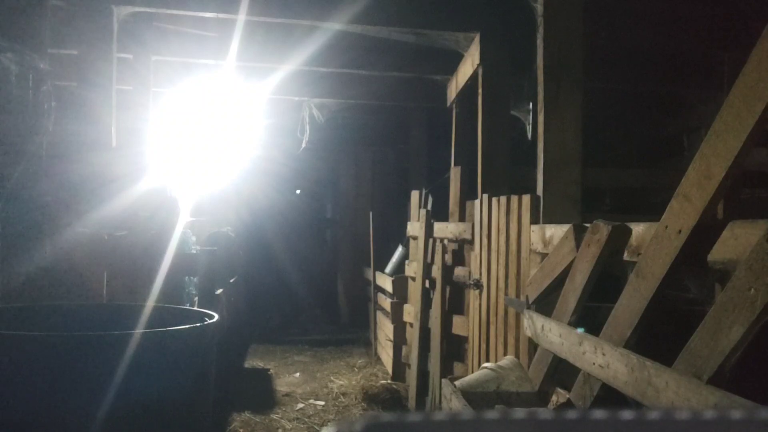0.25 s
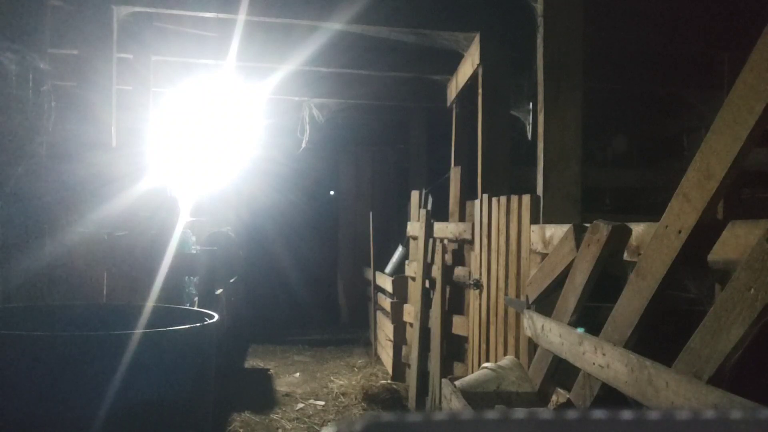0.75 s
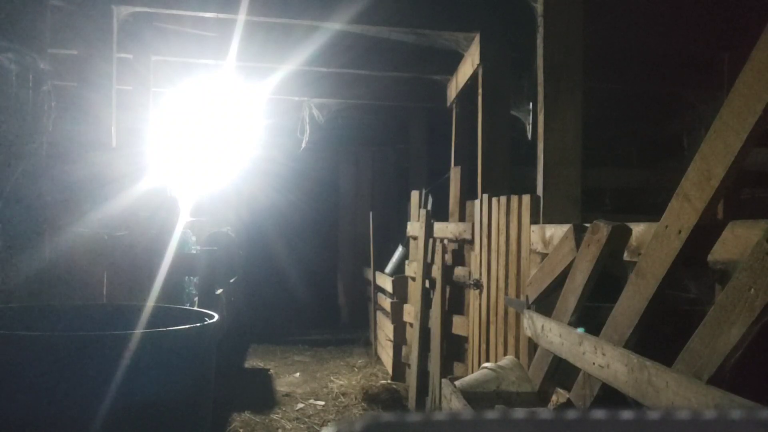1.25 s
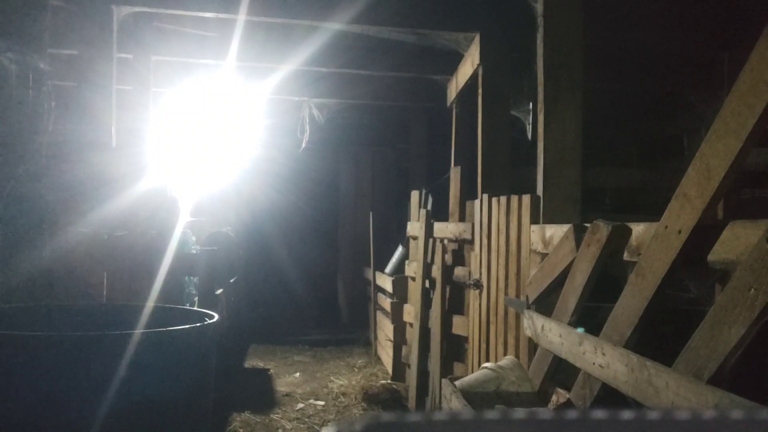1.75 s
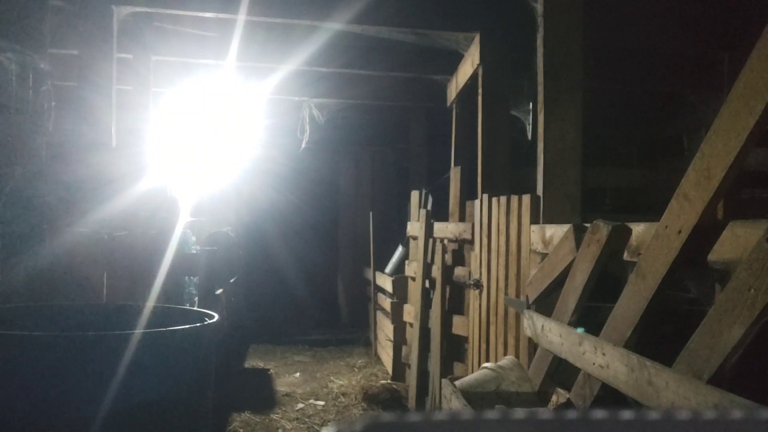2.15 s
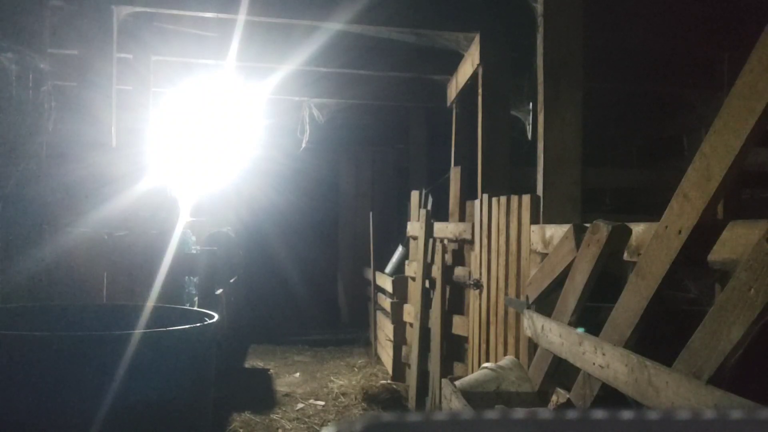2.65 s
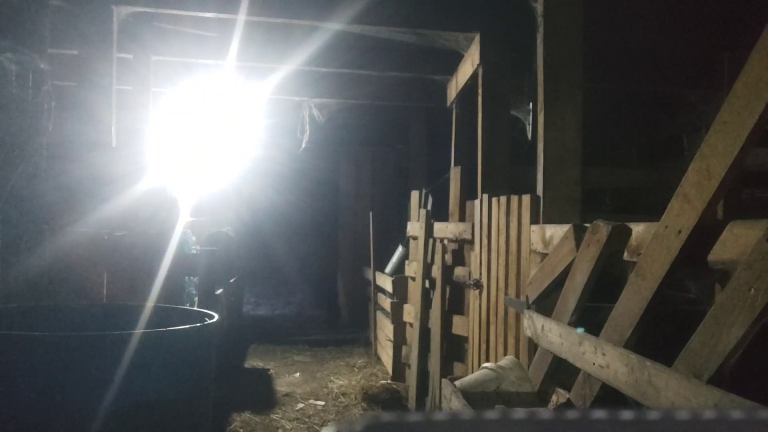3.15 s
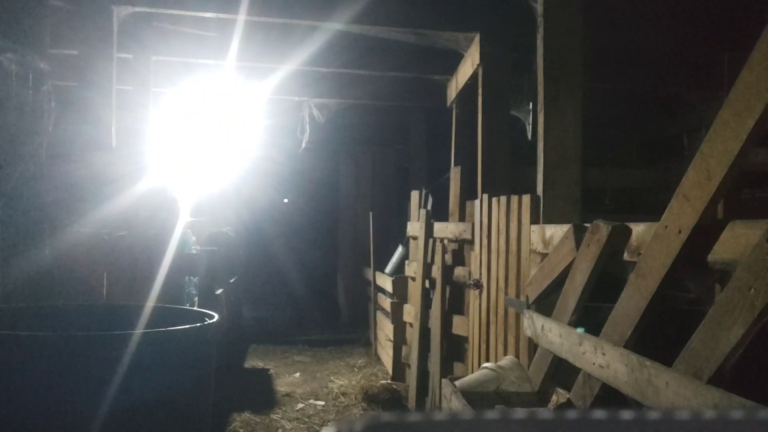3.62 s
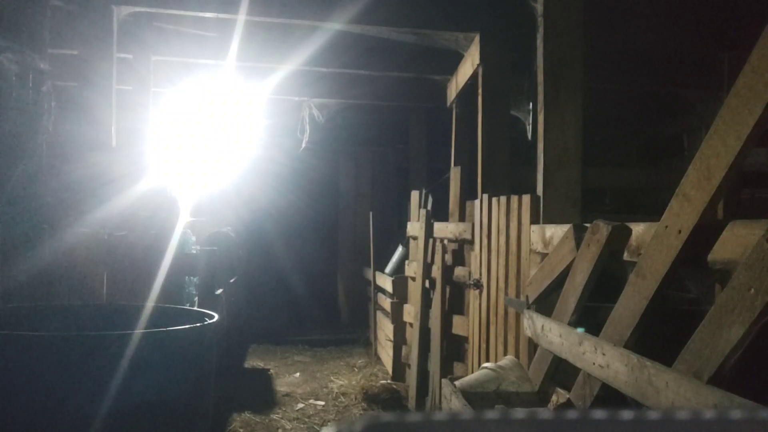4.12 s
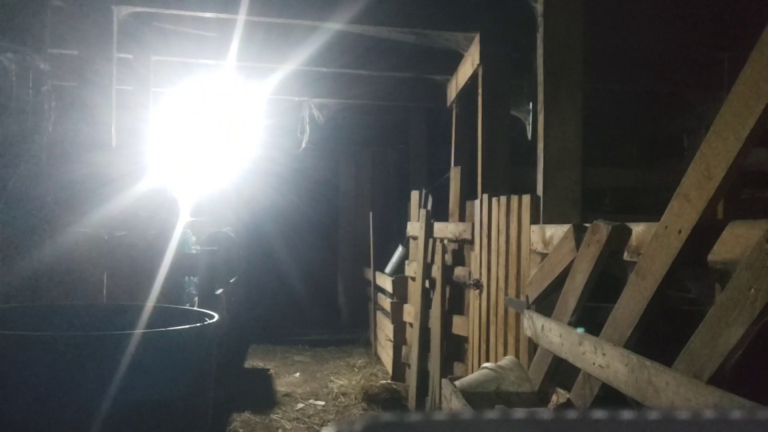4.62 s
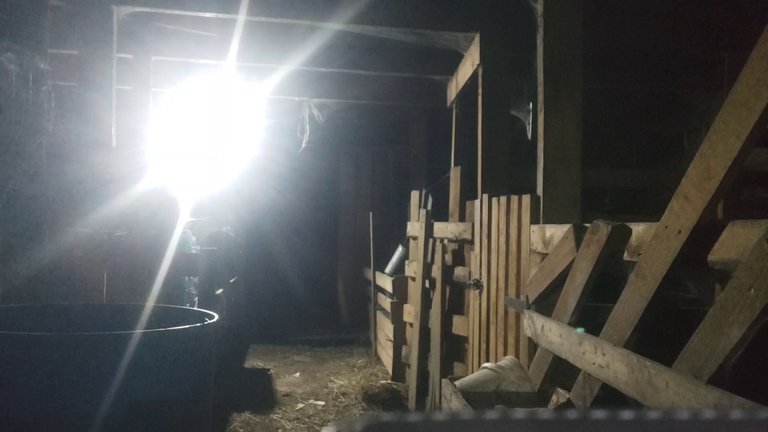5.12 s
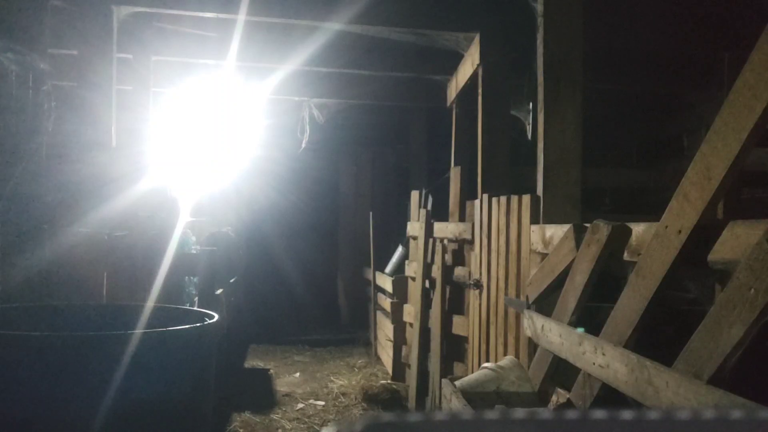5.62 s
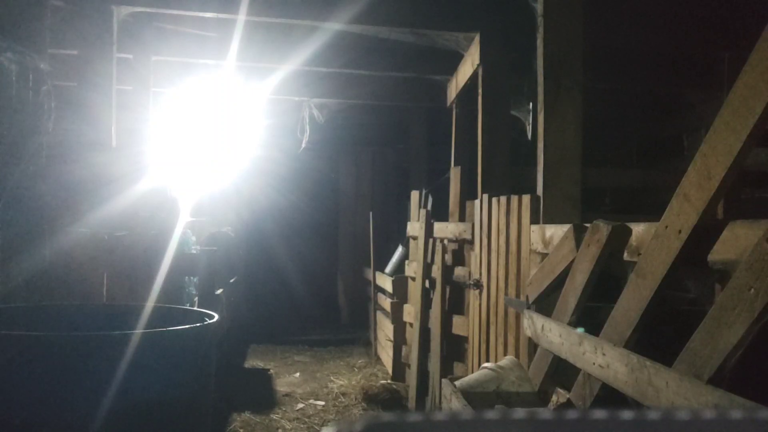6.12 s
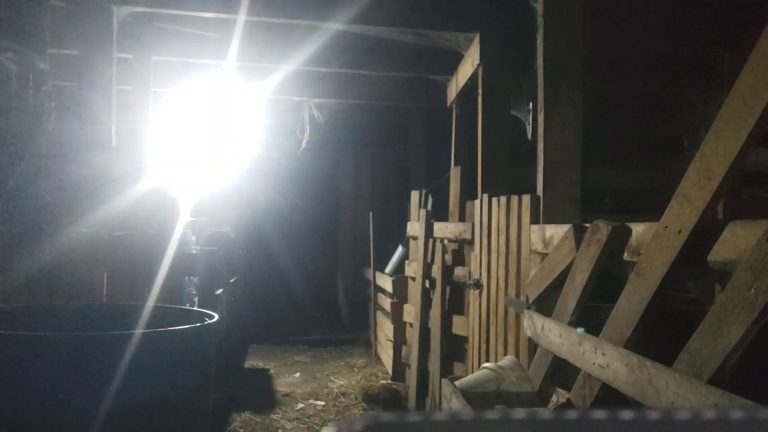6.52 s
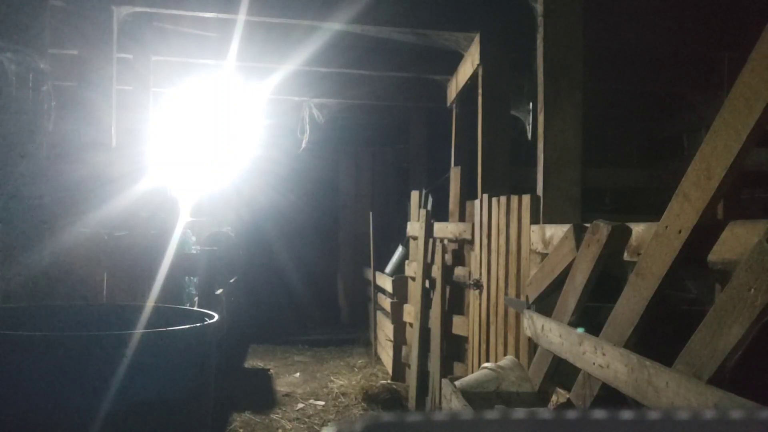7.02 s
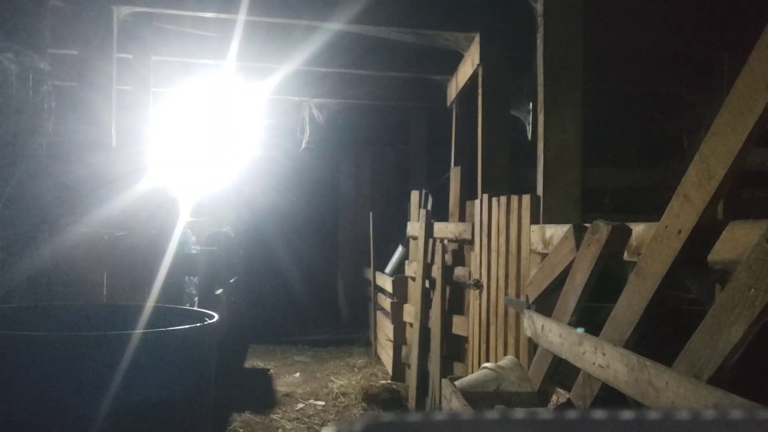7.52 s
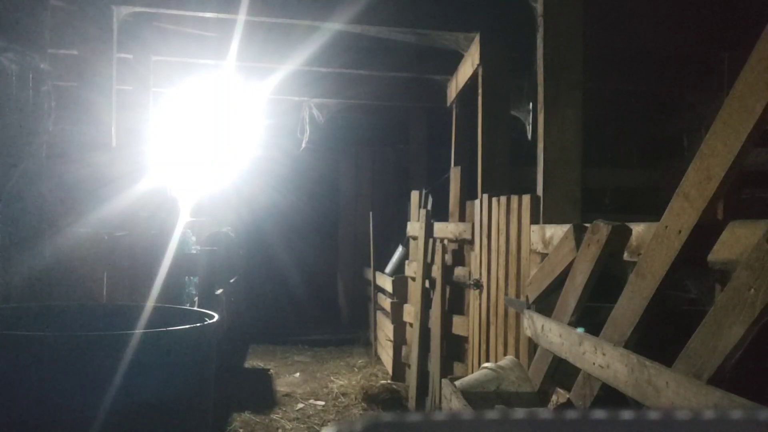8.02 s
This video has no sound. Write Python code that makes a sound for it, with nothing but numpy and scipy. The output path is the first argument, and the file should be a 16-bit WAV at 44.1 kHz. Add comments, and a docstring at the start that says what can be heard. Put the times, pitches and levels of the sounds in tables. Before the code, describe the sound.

In a small wooden barn at night, faint hens call in the distance over low quiet air. A deep plank-door thump lands just before one second, with another weaker double knock around 1.6 seconds, then soft scraping and straw rustle. Low clucks follow, a hen whines waveringly for about a second, and quicker clucks end it. Fixed stereo microphone, short woody echo.

```python
"""Hens in a wooden barn. From the start hens call far off, over a dull murmur, straw and still air;
two main plank-door thumps follow, with crackling contacts, more knocks, two scrapes and a hinge squeak.
Hens cluck in short runs, and from 4.5 s one whines for about a second before the last clucks.
Voices are flutter-modulated harmonics with breath noise and a short echo; the door is noise through
resonances and decaying modes; contacts, straw, murmur and air are coloured noise."""
import sys
import numpy as np
from scipy import signal
from scipy.fft import rfft, irfft, next_fast_len
from scipy.io import wavfile
from scipy.ndimage import map_coordinates

SR = 44100
rng = np.random.default_rng(int(sys.argv[2]) if len(sys.argv) > 2 else 0)


def inscribe(sig):
    """Save sig as 16-bit PCM at rate SR to the path in sys.argv[1].

    A 1-D sig is mono; a 2-D sig holds one channel per row.
    Samples are clipped to [-1, 1] before scaling.
    """
    pcm = np.round(np.clip(np.atleast_2d(sig).T, -1, 1) * 32767)
    wavfile.write(sys.argv[1], SR, pcm.astype(np.int16))


N = 364530


def amp(db):
    """Level to amplitude: 20 dB is a factor of ten."""
    return 10 ** (np.asarray(db) / 20)


def unit(x):
    """Normalisation to a root-mean-square of 1."""
    return x / np.sqrt(np.mean(x ** 2) + 1e-20)


def along(points, hz):
    """Interpolation of (f/Hz, value) points on a logarithmic frequency axis."""
    f, v = np.transpose(points)
    return np.interp(np.log(hz + 1), np.log(f + 1), v)


def curves(rows, t):
    """Linear interpolation in time: each column after the first, read at times t."""
    s, *cols = np.transpose(rows)
    return [np.interp(t, s, c) for c in cols]


def swell(rows):
    """Slow envelope: a gain per sample from (t/s, level/dB) rows."""
    level_db = curves(rows, np.arange(N) / SR)[0]
    return amp(level_db)


def wobble(rate, size):
    """Band-limited random modulation: a smooth curve through `rate` random knots a second."""
    knots = rng.standard_normal(int(size * rate / SR) + 4)
    return map_coordinates(knots, [np.arange(size) * rate / SR])


def filtered(x, response):
    """Linear filtering: the spectrum times a response of frequency."""
    size = x.shape[-1]
    m = next_fast_len(size + 8192)
    return irfft(rfft(x, m) * response(np.fft.rfftfreq(m, 1 / SR)), m)[..., :size]


# interchannel correlation of diffuse sound: f/Hz, correlation/1
CORRELATION = [(60, 0.92), (150, 0.71), (300, 0.74), (600, 0.22), (1200, .063), (4000, 0.066),
               (10000, 0.11)]


def noise(gain, size):
    """Partially coherent stereo noise of rms 1: mid and side shares set the correlation at each frequency."""
    def mid_side_gain(hz):
        angle = np.arccos(np.clip(along(CORRELATION, hz), -1, 1)) / 2
        return gain(hz) * np.array([np.cos(angle), np.sin(angle)])

    mid, side = filtered(rng.standard_normal((2, size)), mid_side_gain)
    return unit(np.array([mid + side, mid - side]))


def hiss(spectrum, size):
    """Coloured noise: a random signal shaped by (f/Hz, level/dB) points."""
    return noise(lambda hz: amp(along(spectrum, hz)), size)


def ringing(modes, size):
    """Resonance: noise confined to a few modes."""
    def response(f):
        return sum(amp(db) * np.abs(f * w / (c * c - f * f + 1j * f * w)) ** 1.47 for c, w, db in modes)

    return noise(response, size)


def add(track, s, sound):
    """Superposition: mix a sound in at time s."""
    start = max(round(s * SR), 0)
    part = sound[..., :max(N - start, 0)]
    track[..., start:start + part.shape[-1]] += part


def blow(t, rise, t60):
    """Damped impact: a quick rise and an exponential decay."""
    return (1 - np.exp(-t / abs(rise))) * amp(-60 * np.maximum(t - rise, 0) / t60)


# the barn's reverberation time: f/Hz, t60/s
BARN_DECAY = [(100, 0.28), (400, 0.31), (1000, 0.27), (3000, 0.33), (10000, 0.036)]


def barn(x, wet_db, lag_ms):
    """Reverberation: sound reaches one ear first, then a fresh decaying echo, at equal total power."""
    hz, t, z = signal.stft(rng.standard_normal((2, SR // 2)), SR, nperseg=256)
    decay = amp(-60 * t / along(BARN_DECAY, hz)[:, None])
    tail = signal.istft(z * decay, SR, nperseg=256)[1]
    echo = amp(wet_db) * tail / np.linalg.norm(tail[0])
    # direct sound: a positive lag delays the left ear
    lag = round(lag_ms * SR / 1000)
    echo[0, max(lag, 0)] += 1
    echo[1, max(-lag, 0)] += 1
    return signal.fftconvolve(x[None], echo, axes=1) / np.sqrt(1 + amp(wet_db) ** 2)


# throat transfer function for overtones and breath: f/Hz, level/dB
THROAT_RESPONSE = [(300, 16), (1200, 3.5), (1550, -2), (1870, -6), (2200, -16), (2850, -24), (3300, -26),
                   (3800, -23), (4080, -16), (4550, -28), (5500, -35), (6900, -22), (8500, -32),
                   (12000, -69)]
# escaping air over the overtones; a raspy note leaks more
PUFF_DB, PUFF_DB_PER_RASP = -3, 24


def syrinx(pitch, partials, overtones_db, rasp, jitter):
    """Source and filter: a vibrating membrane with given low partials, (order, dB), and throat-shaped overtones."""
    size = len(pitch)
    phase = 2 * np.pi * np.cumsum(pitch * (1 + jitter * wobble(200, size))) / SR
    first = int(partials[-1][0]) + 1
    last = min(int(9000 / pitch.max()), 24)
    overtones = []
    for k in range(first, last + 1):
        level_db = overtones_db + along(THROAT_RESPONSE, k * pitch) + 4 * wobble(30, size)
        overtones.append((k, level_db))
    tone = np.zeros(size)
    for k, db in partials + overtones:
        # rasp: alternate cycles differ and flutter, more in the upper harmonics
        flutter = 1 + rasp * min(k / 2, 2) * (np.cos(phase / 2) + wobble(250, size))
        tone += amp(db) * flutter * np.sin(k * phase + rng.uniform(0, 2 * np.pi))
    # air escapes once a cycle
    breath = rng.standard_normal(size) * (1 + np.cos(phase))
    puffs = filtered(breath, lambda hz: amp(along(THROAT_RESPONSE, hz)) * hz ** 2 / (hz ** 2 + 600 ** 2))
    puff_gain = amp(overtones_db + PUFF_DB + PUFF_DB_PER_RASP * rasp)
    return np.sqrt(2) * tone + puff_gain * unit(puffs)


# a held note wavers: share of its pitch; knots a second in pitch and in level
QUAVER, QUAVER_RATE, FLUTTER_RATE = .007, 34, 80


def held_note(pitch, partials, overtones_db, rasp, jitter, flutter_db):
    """Frequency and amplitude modulation: a drawn-out note quavers in pitch and flutters in level."""
    size = len(pitch)
    fluttering = [(k, db + flutter_db * wobble(FLUTTER_RATE, size)) for k, db in partials]
    wavering = pitch * (1 + QUAVER * wobble(QUAVER_RATE, size))
    voice = syrinx(wavering, fluttering, overtones_db, rasp, jitter)
    return voice * signal.windows.tukey(size, .04)


# orders of the low partials: harmonics and those halfway between
LOW_ORDERS = np.arange(2, 8) / 2
MOUTH_WIDTH_HZ = 153  # half-width of the resonance


def mouth(pitch_hz, bright_db, mouth_hz, hoarse):
    """Formant: shares in dB as a resonance picks among low partials; hoarseness fills the halfway ones."""
    orders = LOW_ORDERS[1:]
    strength = np.where(orders % 1, abs(hoarse) + 1e-6, 1)
    upper = strength / (1 + ((pitch_hz * orders - mouth_hz) / MOUTH_WIDTH_HZ) ** 2)
    gains = np.append(1, amp(bright_db) * upper / np.linalg.norm(upper))
    return 20 * np.log10(gains / np.linalg.norm(gains))


# vocal effort, the octave's level outside the dips: t/s, level/dB
WHINE_EFFORT = [(4.55, -54), (4.59, -46), (4.69, -40), (4.75, -42), (4.88, -34.5), (5.0, -32.5),
                (5.11, -33.5), (5.155, -29.5), (5.2, -37), (5.27, -46), (5.305, -33), (5.365, -34),
                (5.39, -45), (5.44, -44), (5.452, -27), (5.53, -28.5), (5.625, -32), (5.65, -41),
                (5.7, -50)]
# pitch slides up, holds and sags before the last push: t/s, f/Hz
WHINE_PITCH = [(4.55, 500), (4.63, 506), (4.69, 528), (4.78, 538), (4.92, 533), (5.09, 545), (5.3, 541),
               (5.48, 531), (5.64, 546)]
# short dips in the call's level: centre t/s, length/s, depth at the octave/dB
WHINE_DIPS = [(4.645, .024, 14), (4.728, .025, 9), (4.852, .016, 13), (4.912, .022, 13), (5.036, .02, 14),
              (5.125, .016, 7), (5.186, .028, 14), (5.255, .06, 10), (5.331, .026, 18), (5.506, .014, 14),
              (5.559, .018, 14), (5.596, .016, 13)]
# harmonics above the octave: order, level against the effort/dB
WHINE_UPPER = [(3, -27), (4, -31), (5, -47), (6, -44), (7, -45), (8, -39)]
DIP_LOWERS_HZ, DIP_RASP = 14, .22  # the call is lower and rougher in each dip
EASY_DB = -38  # the effort of an easy note
FUNDAMENTAL_DB, FUNDAMENTAL_GROWS = -42.7, .17  # at easy effort; growth in dB per dB of effort
WHINE_THROAT_DB, WHINE_WET_DB = -19, -7  # the throat's overtones; the barn's answer
MOMENT_S = .06  # spacing of the overlapping moments, each given a fresh random echo


def whine():
    """Effort-dependent timbre: the octave grows with effort in one long call whose level dips briefly."""
    out = np.zeros((2, N))
    start, end = WHINE_EFFORT[0][0], WHINE_EFFORT[-1][0]
    t = np.arange(int((end - start) * SR)) / SR
    effort_db, = curves(WHINE_EFFORT, start + t)
    dips = np.array([np.exp(-(2 * (start + t - s) / length) ** 2) for s, length, _ in WHINE_DIPS])
    dip = dips.sum(axis=0)
    dip_db = np.array(WHINE_DIPS)[:, 2] @ dips
    pitch = curves(WHINE_PITCH, start + t)[0] - DIP_LOWERS_HZ * dip
    first_db = FUNDAMENTAL_DB + FUNDAMENTAL_GROWS * (effort_db - EASY_DB)
    overtones_db = (first_db + effort_db) / 2 + WHINE_THROAT_DB
    partials = [(1, first_db - dip_db / 2), (2, effort_db - dip_db)]
    partials += [(k, effort_db + db) for k, db in WHINE_UPPER]
    rasp = .08 + DIP_RASP * dip
    voice = held_note(pitch, partials, overtones_db, rasp, jitter=.016, flutter_db=2.8)
    for s in np.arange(0, end - start + MOMENT_S, MOMENT_S):
        moment = np.maximum(1 - np.abs(t - s) / MOMENT_S, 0)
        add(out, start, barn(moment * voice, wet_db=WHINE_WET_DB, lag_ms=.18))
    return out


# clucks: t/s, length/s, f/Hz, glide as a share of the pitch, relative level/dB,
# upper partials over fundamental before the beak's action/dB, mouth resonance f/Hz,
# relative throat overtones/dB, hoarseness/1
CLUCK_NOTES = [ (.541, 0.06, 358, -0.032, -43, 1, 940, -19, 0.18),
               (.694, 0.031, 335, -0.046, -40.5, 3.5, 726, -24, .3),
               (0.717, .04, 305.7, -.08, -41, 1, 780, -21, .2),
               (3.888, 0.04, 341.3, -0.044, -41.5, 13, 640, -28, .1),
               (4.071, 0.031, 350, .03, -45, 7, 660, -26, 0.2),
               (4.178, .06, 302, -0.06, -46, -1, 600, -23, .1),
               (4.332, .07, 286, .05, -43, -1.5, 574, -19, .15),
               (4.408, .06, 312, .06, -42.5, 5, 625, -17, .12),
               (4.472, .048, 333, .02, -43.5, 7, 665, -19, .15),
               (4.979, 0.054, 306, .03, -39.5, 5.5, 690, -25, 0.3),
               (5.097, .077, 310.8, .03, -41.5, 6.5, 626, -19, 0.1),
               (5.218, .066, 311.5, -.03, -40, 8, 645, -14.5, 0.4),
               (5.335, .058, 342, .12, -39.5, 11, 720, -16.5, .45),
               (5.452, .067, 344.8, 0.089, -38, 13.5, 815, -15, 0.57),
               (5.601, .06, 452, -.01, -38.5, -3.5, 900, -19, .15),
               (6.05, 0.035, 322.6, 0.0038, -38.5, -5, 830, -18, .2),
               (6.073, 0.051, 338.3, 0.032, -42.5, 14, 880, -13, 0.5),
               (6.168, .03, 357, .05, -36.5, 4, 800, -16, 0.27),
               (6.201, .028, 440, -0.023, -37.5, 8.5, 820, -14, .5),
               (6.236, .024, 430, -.02, -40.5, 11, 900, -13, 0.7),
               (6.278, 0.029, 373, 0.064, -40, 2.5, 778, -15, .2),
               (6.307, 0.032, 458.6, 0.037, -33.5, -1, 900, -15.5, .25),
               (6.357, 0.032, 480, -0.037, -42, 6, 980, -14, 0.4),
               (6.411, .066, 448, -.08, -33.5, 2.5, 885, -20, 0.04),
               (7.229, 0.043, 322, -0.017, -41, -4, 734, -21.5, 0.07),
               (7.288, 0.051, 326.5, -.02, -37, -1.5, 960, -22, .02),
               (7.393, 0.067, 325.3, 0, -38.5, -5.5, 740, -20, 0.08),
               (7.419, .045, 366.5, -.02, -39, -4, 860, -13, .02),
               (7.518, .067, 374.5, .03, -37.5, -5, 900, -19, .08),
               (7.538, 0.063, 306, -.04, -39, -6, 730, -25.5, 0.16),
               (7.628, 0.074, 382.8, 0.023, -34.5, -11, 870, -27, 0.2),
               (7.736, .062, 402.6, .06, -38.5, -1, 910, -21, .12),
               (7.837, 0.047, 400.7, .01, -36.5, -1, 900, -22, 0.42),
               (7.875, 0.048, 436, -.1, -37, 1.5, 955, -14, .25),
               (7.982, .078, 432, -.04, -37.5, 7.5, 990, -18, .7)]
# where the clucking comes from: t/s, left ear's lag/ms
CLUCK_BEARING = [(0, 0.28), (5.4, 0.19), (5.6, 0.38), (7.45, 0.37), (7.6, -0.2), (8.27, -0.32)]
CLUCK_ATTACK_S, CLUCK_RELEASE_S, CLUCK_ARCH = 0.0029, 0.021, 0.047
BEAK_OPENS_S, BEAK_SHUT_DB = 0.02, -4.5
CLUCK_RASP, RASP_PER_HOARSE = .11, .38  # flutter of the partials, more in a hoarse note
CLUCK_JITTER, CLUCK_BEND = .025, .012  # fast and slow unsteadiness, as shares of the pitch


def clucks():
    """Time-varying radiation: abrupt notes arch in pitch while the opening beak brings out upper partials."""
    out = np.zeros((2, N))
    for s, length, hz, glide, db, bright_db, mouth_hz, overtones_db, hoarse in CLUCK_NOTES:
        t = np.arange(int((length + .04) * SR)) / SR
        through = np.minimum(t / length, 1.2)
        arch = CLUCK_ARCH * (1 / 3 - (2 * through - 1) ** 2)
        bend = CLUCK_BEND * wobble(45, len(t))
        pitch = hz * (1 + arch + bend + glide * (through - .5))
        attack = np.clip(t / CLUCK_ATTACK_S, 0, 1)
        release = np.clip((length + 0.0096 - t) / CLUCK_RELEASE_S, 0, 1)
        # the beak opens after the note starts: upper partials come out as the fundamental fades
        shut_db = BEAK_SHUT_DB * np.exp(-t / BEAK_OPENS_S)
        first_db, *upper_dbs = db + mouth(hz, bright_db, mouth_hz, hoarse)
        low_dbs = [first_db + 3.0 - 4 * through]
        low_dbs += [upper_db + shut_db + 1.5 for upper_db in upper_dbs]
        partials = list(zip(LOW_ORDERS, low_dbs))
        rasp = CLUCK_RASP + RASP_PER_HOARSE * hoarse
        voice = syrinx(pitch, partials, db + overtones_db + shut_db, rasp, CLUCK_JITTER)
        lag_ms = curves(CLUCK_BEARING, s)[0]
        add(out, s, barn(attack * release * voice, wet_db=-6, lag_ms=lag_ms))
    return out


# far hens: t/s, length/s, nominal start f/Hz, nominal end f/Hz, mid-call relative level/dB,
# upper partials over fundamental/dB, mouth resonance f/Hz, hoarseness/1
FAR_NOTES = [(0, .37, 668, 678, -59, -1, 1400, .02), (.01, .08, 275, 280, -55, 9, 830, .3),
             (.34, .19, 668, 636, -54, -11, 1400, .02), (.52, .11, 655, 690, -55, -7, 1350, .02),
             (2.05, .07, 300, 302, -52, 10, 900, .1), (2.24, .24, 328, 312, -52.5, 1, 650, .25),
             (2.49, .13, 324, 322, -50.5, 0, 640, .05), (2.5, .11, 298, 303, -57, 12, 900, .15),
             (2.61, .14, 314, 338, -51, 3, 990, .1), (2.765, .09, 303, 299, -53, 2, 880, .2),
             (2.93, .085, 298, 303, -50, 12, 900, .2), (3.01, .08, 283, 285, -51, 12, 850, .3),
             (3.105, .065, 294, 303, -52.5, 10, 950, .15), (3.25, .065, 299, 303, -51.5, 11, 930, .08),
             (5.622, .39, 287, 284, -56, 2, 560, .1), (6.759, .069, 540, 544, -60, -20, 1100, .1),
             (6.92, .1, 534, 540, -58, -13.5, 1100, .05)]
FAR_ARCH, FAR_FADE_DB = 0.031, 5.5  # each call arches in pitch and is softer at both ends


def far_hens():
    """Low direct-to-reverberant ratio: soft arching calls half lost in the barn's echo."""
    out = np.zeros((2, N))
    for s, length, start_hz, end_hz, db, bright_db, mouth_hz, hoarse in FAR_NOTES:
        through = np.linspace(0, 1, int(length * SR))
        edge = (2 * through - 1) ** 2
        glide = start_hz + (end_hz - start_hz) * through
        pitch = glide * (1 + FAR_ARCH * (edge.mean() - edge))
        level_db = db - FAR_FADE_DB * edge
        shares_db = mouth(start_hz, bright_db, mouth_hz, hoarse)
        partials = [(k, level_db + share_db) for k, share_db in zip(LOW_ORDERS, shares_db)]
        voice = held_note(pitch, partials, level_db - 21, rasp=hoarse / 3, jitter=.026, flutter_db=3)
        add(out, s, barn(voice, wet_db=-2, lag_ms=0.23))
    return out


# blows on the door: t/s, relative levels of panel/dB, planks/dB, latch/dB, rise/s,
# sway level/dB, panel mode f/Hz, plank mode f/Hz
DOOR_BLOWS = [(0, -52, -57, -73, .0088, -59, 90, 228), (.835, -23.5, -27, -43.5, 0.011, -32, 70.8, 378.3),
              (1.004, -41, -42.5, -35.5, 0.014, -50, 62, 250), (1.1, -43, -41.5, -67, .014, -59, 72, 395),
              (1.541, -27, -29, -49, 0.0073, -30.5, 107.7, 339.4),
              (1.8, -32, -32.5, -42, 0.0081, -34, 107.1, 339),
              (2.201, -39, -53, -51, .026, -36.5, 75.7, 178),
              (3.684, -55, -67, -46.5, 0.0058, -64.5, 150, 340),
              (3.818, -61, -69, -44, .002, -64.5, 150.5, 340)]
# resonances of the door's parts: f/Hz, nominal width/Hz, level/dB
PANEL_MODES = [(29.6, 14, -1), (61, 25, 0.5), (74, 7.4, 1), (109.4, 9.6, 2.5), (158.7, 41, 3),
               (186.2, 12.6, 4), (241, 15, 0), (290, 18, -5.5)]
PLANK_MODES = [(230, 38, -7), (337, 34, 0.5), (375.4, 11, 1), (540, 82, -12.5), (629, 5.3, 1),
               (763, 15, -9.5)]
LATCH_MODES = [(968, 49, -2.5), (1106, 22, 4), (2390, 170, -14.5)]
PANEL_LAG_S, SWAY_RISE_S, SWAY_T60_S = .018, 0.16, 2.35  # the panel booms late, then swings and pumps air
# each blow's own panel and plank modes, against the panel and plank levels
BOOM_DB, BOOM_T60_S, KNOCK_DB, KNOCK_T60_S = -1, .5, -1, .22


def door():
    """Modal excitation: a blow rings planks and latch at once; the heavy panel booms later and sways."""
    out, swing = np.zeros((2, N)), np.zeros(N)
    t = np.arange(SR) / SR
    slow_t = np.arange(N) / SR
    sway_decay = amp(-60 * np.maximum(slow_t - SWAY_RISE_S, 0) / SWAY_T60_S)
    sway = np.minimum(slow_t / SWAY_RISE_S, 1) ** 2 * sway_decay

    def mode(hz):
        """Normal mode: a sine with a slightly wandering phase."""
        return np.sin(2 * np.pi * hz * t + .4 * wobble(40, len(t)))

    for s, panel_db, plank_db, latch_db, rise, sway_db, boom_hz, knock_hz in DOOR_BLOWS:
        add(out, s, amp(plank_db) * blow(t, rise, 0.32) * ringing(PLANK_MODES, len(t)))
        add(out, s, amp(plank_db + KNOCK_DB) * blow(t, rise, KNOCK_T60_S) * mode(knock_hz))
        add(out, s, amp(latch_db) * blow(t, rise, 0.23) * ringing(LATCH_MODES, len(t)))
        boom = blow(t, 0.019, 0.5) + amp(-19.5) * blow(t, 0.081, 1.47)
        add(out, s + PANEL_LAG_S, amp(panel_db) * boom * ringing(PANEL_MODES, len(t)))
        add(out, s + PANEL_LAG_S, amp(panel_db + BOOM_DB) * blow(t, rise, BOOM_T60_S) * mode(boom_hz))
        # sways add in power
        add(swing, s, (amp(sway_db) * sway) ** 2)
    sway_colour = [(5, -28.5), (13, 2.5), (18, -8.5), (30, -12), (45, -23.0), (120, -43.5), (400, -120)]
    return out + np.sqrt(swing) * hiss(sway_colour, N)


# the door drags: t/s, length of the build/s, level at its end/dB
DOOR_DRAGS = [(1.85, 0.4, -44), (2.512, .53, -48.3)]
# spectrum of the drag: f/Hz, relative level/dB
DRAG_COLOUR = [(60, -14.5), (185, -0.5), (330, 2), (600, -2), (950, -5), (1400, -10), (2400, -16),
               (3000, -22.5), (4000, -35), (8000, -50.5)]
# the hinge: t/s, length/s, level/dB, resonance f/Hz, nominal width/Hz
HINGE_SQUEAK = (2.745, 0.02, -58.5, 2500, 350)
SCRAPE_BUILD_DB, SCRAPE_T60_S = 8.5, 1.08  # each drag builds up, then dies away
SLIP_DB, SLIP_RATE = 1.3, 40  # catching and slipping: depth, knots a second


def scrapes():
    """Stick-slip friction: the dragging door builds up, then lets go; its hinge squeaks hoarsely once."""
    force = np.zeros(N)
    t = np.arange(2 * SR) / SR
    for s, length, db in DOOR_DRAGS:
        build_db = SCRAPE_BUILD_DB * np.minimum(t / length - 1, 0)
        decay_db = -60 * np.maximum(t - length, 0) / SCRAPE_T60_S
        add(force, s, amp(db + build_db + decay_db) * np.minimum(t / .05, 1))
    slips = unit(amp(SLIP_DB * wobble(SLIP_RATE, N)))
    out = force * slips * hiss(DRAG_COLOUR, N)
    s, length, db, hz, width_hz = HINGE_SQUEAK
    size = int(length * SR)
    add(out, s, amp(db) * signal.windows.tukey(size) * ringing([(hz, width_hz, 0)], size))
    return out


# sharp contacts of wood and straw: t/s, snap level/dB, woody body over snap/dB, t60/s, top edge f/Hz
CONTACTS = [(.378, -57, 16, .14, 3000), (.515, -50, -7, .16, 10000), (.595, -60, 11, 0.14, 6000),
            (.807, -47, 2, .5, 9500), (.846, -43, -1, .5, 12500), (.868, -44, -1, .4, 12000),
            (1.001, -37.5, -3, .21, 15000), (1.334, -49, 3.5, .22, 10000), (1.52, -44, -9, .1, 9000),
            (1.541, -34.5, 6.5, .29, 9300), (1.801, -38, 7.5, .23, 8800), (1.932, -52.5, 0.5, .22, 9000),
            (2.19, -44.5, -1, .28, 10000), (2.325, -60, 6, .25, 6000), (2.562, -54, -20, .16, 10000),
            (3.682, -47, 5, .37, 9500), (3.723, -53, 1, .8, 10000), (3.785, -59, 10, .25, 2500),
            (3.818, -45, 12, .07, 2500), (3.942, -55, 4.5, .15, 10000), (4.142, -52.5, 11, .12, 7500),
            (4.228, -47, -5, .56, 12000), (4.26, -52, 7, .36, 12000), (4.472, -57, 6, .16, 9000),
            (4.559, -51, -6, .14, 10000), (4.805, -49.5, -3, .12, 10000), (5.099, -40.5, -24, .15, 10500),
            (6.578, -51, 8.5, .21, 9500), (6.992, -54, 5.5, .24, 10000)]
# spectra of the snap (brightest near 7 kHz) and the clack: f/Hz, relative level/dB
SNAP_COLOUR = [(1200, -40), (2500, -12), (4500, -9), (6000, -0.5), (7100, 10.5), (8800, -2.5), (9700, -14),
               (11500, -12), (15000, -36)]
CLACK_COLOUR = [(120, -11), (350, 0.5), (700, -1.5), (1300, 0), (1900, -4), (2350, -1.5), (2600, -6),
                (2850, -2.5), (3300, -8.5), (5000, -11), (9000, -29), (12000, -67)]
# the boards' ring: f/Hz, nominal width/Hz, level/dB
BOARD_MODES = [(645, 50, 3), (1130, 90, -2), (1330, 50, -4), (1650, 70, -2), (2290, 70, -2), (2400, 70, -1),
               (2860, 100, -1), (3500, 150, -8)]
CRACK_RISE_S = 0.0029
TICK_DB, TICK_RISE_S, TICK_T60_S = -11, .0004, .03  # the first sharp touch of a contact
CLACK_DB, BOARDS_DB = -2, -2.5  # the dull clack, and the ring at a full blow, in a woody body
FULL_BLOW_DB, RING_GROWS = -27, .5  # contacts lighter than a full blow ring the boards less
RATTLE_DB, RATTLE_RATE = 2.2, 220  # loose boards chatter within each contact: depth, knots a second


def cracks():
    """Impact spectrum: chattering snap noise over a woody clack and board ring, low-passed per contact."""
    out = np.zeros((2, N))
    t = np.arange(SR // 2) / SR
    for s, db, body_db, t60, edge_hz in CONTACTS:
        chatter = unit(amp(RATTLE_DB * wobble(RATTLE_RATE, len(t))))
        envelope = blow(t, CRACK_RISE_S, t60) + amp(TICK_DB) * blow(t, TICK_RISE_S, TICK_T60_S)
        ring_db = BOARDS_DB + RING_GROWS * (db + body_db - FULL_BLOW_DB)
        clack = amp(CLACK_DB) * hiss(CLACK_COLOUR, len(t))
        body = clack + amp(ring_db) * ringing(BOARD_MODES, len(t))
        contact = hiss(SNAP_COLOUR, len(t)) + amp(body_db) * body
        burst = filtered(contact, lambda hz: (1 + (hz / edge_hz) ** 10) ** -.5)
        add(out, s, amp(db) * envelope * chatter * burst)
    return out


# rustling straw: t/s, relative level/dB
STRAW_LEVEL = [(0, -70.5), (.95, -56), (1.35, -69.5), (1.72, -61), (2.15, -61.5), (2.55, -74), (3.08, -58),
               (3.6, -64), (5.3, -62.5), (5.6, -71.5), (6.85, -75), (8.27, -74)]
# its spectrum: f/Hz, relative level/dB
STRAW_SPECTRUM = [(880, -36), (1500, -1), (1620, 0.5), (1860, 2), (2070, -4.5), (2260, 1), (3310, -4),
                  (4570, -9.5), (7020, 6), (9790, -16.5), (15500, -37)]


def straw():
    """Granular friction: bright noise with random slow and fast crackle in its level."""
    crackle = unit(amp(2.5 * wobble(22, N) + 1.8 * wobble(500, N)))
    return amp(2.0) * swell(STRAW_LEVEL) * crackle * hiss(STRAW_SPECTRUM, N)


# dull murmur of the barn: t/s, relative level/dB
MURMUR_LEVEL = [(0, -55.5), (2.3, -51), (3.8, -55.5), (4.4, -47), (5.7, -59.5), (6.3, -46), (6.75, -56.5),
                (7.2, -61), (7.5, -58.5), (8.27, -52.5)]


def murmur():
    """Amplitude-modulated noise: the dull, uneven murmur of the barn."""
    colour = [(60, -21), (170, 2.0), (320, 3.5), (600, 2.5), (1000, -3.5), (2000, -22.0), (6000, -44.5)]
    return amp(-4.5) * swell(MURMUR_LEVEL) * amp(1.6 * wobble(9, N)) * hiss(colour, N)


# spectrum of the quiet barn: f/Hz, relative level/dB
AIR_COLOUR = [(20, 10), (60, 0.5), (150, -7.5), (300, -6.5), (550, -15), (750, -32), (1100, -23.5),
              (2000, -24), (4500, -28), (7200, -34), (9000, -26.5), (10000, -42), (15500, -46)]
AIR_DB = -57.5


def still_air():
    """Stationary noise: the steady, bass-heavy floor of a quiet barn."""
    return amp(AIR_DB) * hiss(AIR_COLOUR, N)


# stereo tilt: f/Hz, left minus right/dB
STEREO_LEAN = [(60, 4), (250, 4.5), (550, 4.5), (1100, -2), (2200, 0.5), (4300, -3), (8000, -5.5),
               (13000, 2)]


def scene():
    """Superposition and level difference: all sources sum; the bass leans left and most of the treble right."""
    voices = whine() + clucks() + far_hens()
    wood = door() + scrapes() + cracks()
    mix = voices + wood + straw() + murmur() + still_air()
    return filtered(mix, lambda hz: amp(np.outer([.5, -.5], along(STEREO_LEAN, hz))))


TOP_HZ = 15700


def record(dry):
    """Band limitation: an ideal low-pass removes everything from the top frequency up."""
    return filtered(dry, lambda hz: hz < TOP_HZ)


dry = scene()
out = record(dry)
inscribe(out)
```